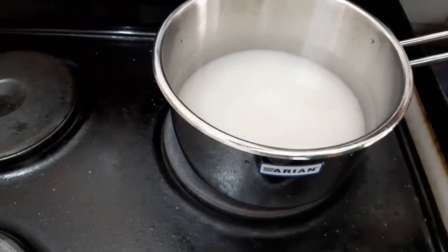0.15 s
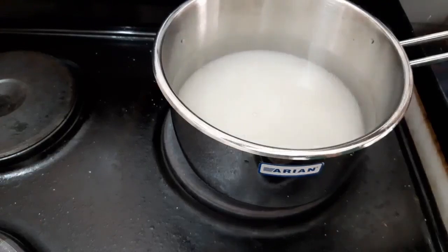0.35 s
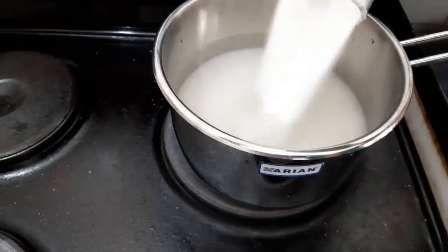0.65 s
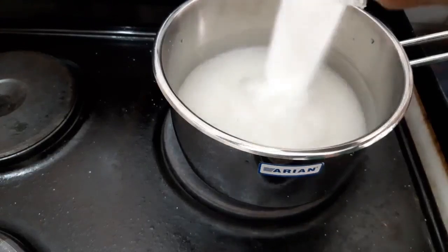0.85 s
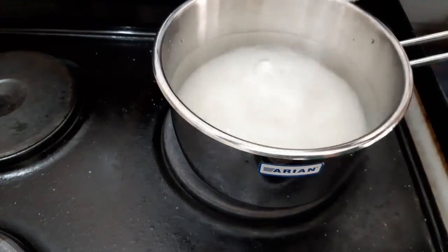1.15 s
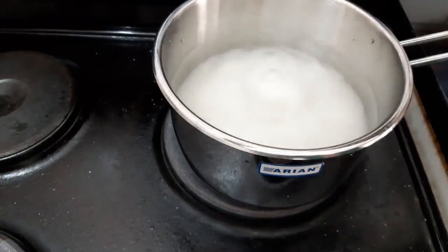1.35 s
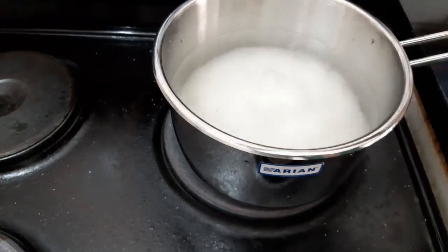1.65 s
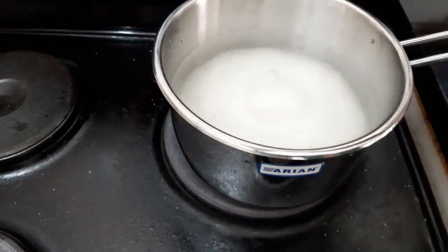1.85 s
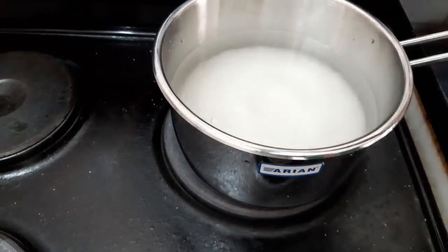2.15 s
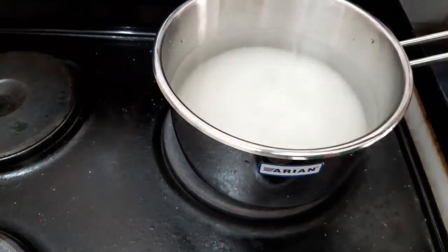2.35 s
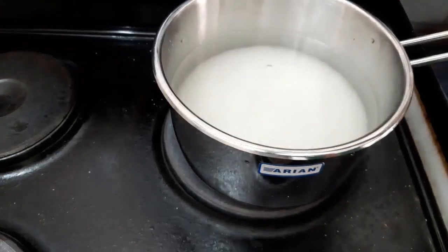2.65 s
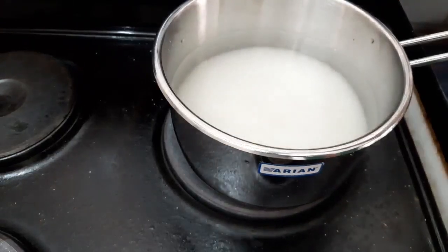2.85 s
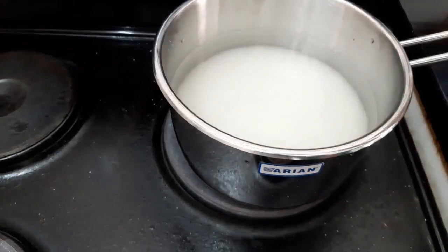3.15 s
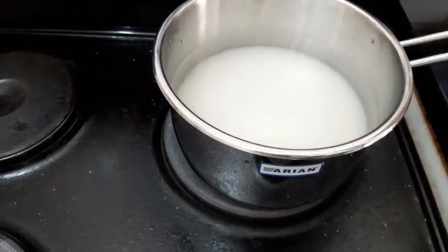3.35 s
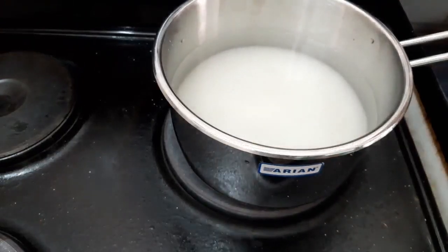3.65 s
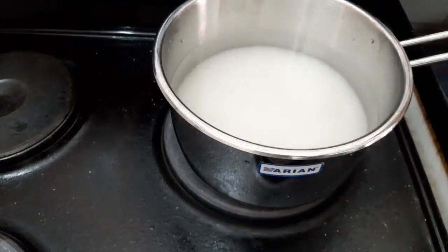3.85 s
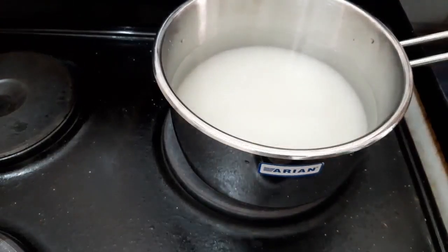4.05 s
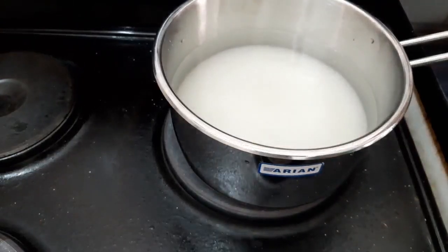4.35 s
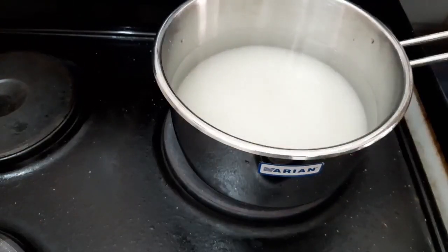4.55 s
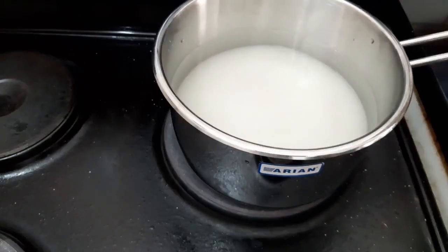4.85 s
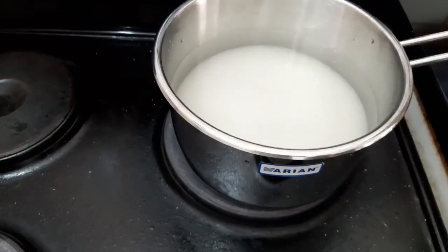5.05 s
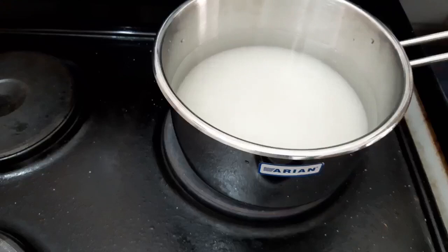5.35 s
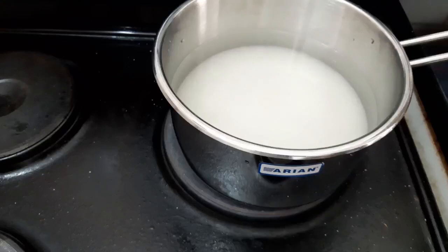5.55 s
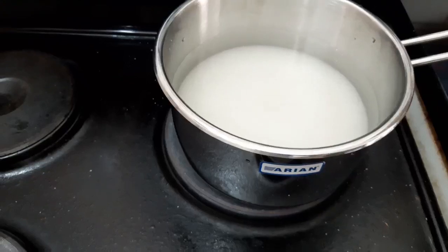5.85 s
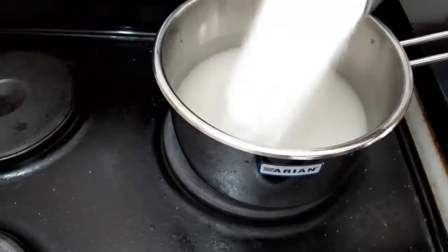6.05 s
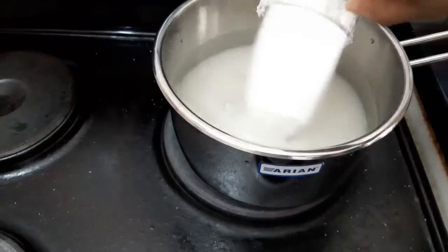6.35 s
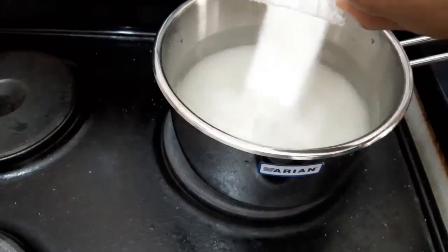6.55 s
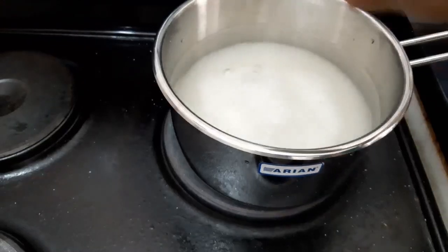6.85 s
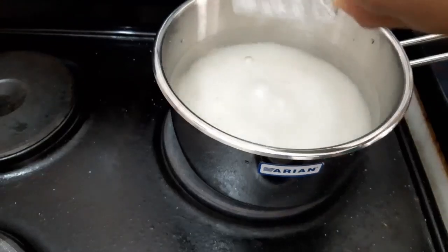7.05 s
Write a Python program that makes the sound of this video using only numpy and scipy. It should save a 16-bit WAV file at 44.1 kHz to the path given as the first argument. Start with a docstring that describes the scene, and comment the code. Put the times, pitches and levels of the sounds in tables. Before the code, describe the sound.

Close, nearly mono pickup in a small hard kitchen with a faint low hum. Sugar rushes into a steel saucepan of water with a crisp hiss, fizzing and small rising glugs. A spoon clinks on a cup, sugar is scooped and slides, a tin clatters and is set down heavily on the counter. After a split-second dropout, a second pour patters and bubbles.

```python
"""A small hard kitchen: sugar slides from a cup into a steel saucepan of water, twice, over a low hum.
Dense random grains make the hiss; rising tones make the glugs of trapped air and the small bubbles.
Between the pours a spoon clinks on a cup, sugar is scooped, a tin clatters and is set down on the counter:
short noisy pushes ring banks of decaying modes. The sound drops out for a moment before the second pour."""
import sys
import numpy as np
from scipy import signal
from scipy.fft import rfft, irfft, next_fast_len
from scipy.io import wavfile
from scipy.ndimage import uniform_filter1d

SR = 44100
rng = np.random.default_rng(int(sys.argv[2]) if len(sys.argv) > 2 else 0)


def bounce(signal):
    """Save signal as a 16-bit WAV file at the path given by the first command-line argument."""
    frames = np.transpose(np.atleast_2d(signal))
    limited = np.clip(frames, -1, 1)
    pcm = np.round(limited * 32767).astype(np.int16)
    wavfile.write(sys.argv[1], SR, pcm)


N = 318357
T = np.arange(N) / SR  # s

# Streams of sugar: first pour, scoop, long slide, second pour; each a list of
# start_s [s], fine_level_db [dB], coarse_against_fine_db [dB]
SUGAR_STREAMS = [
    [(0, -64, -23), (.05, -56, -19), (.25, -59, -16), (.32, -47.5, -16), (.52, -54.5, -9), (.608, -44, -17),
     (.67, -50, -6), (.76, -52.5, -6.5), (1.0, -57, -5.5), (1.2, -67, -4.5), (1.3, -81, -5)],
    [(1.75, -86, -9), (1.9, -63.5, -15), (2.11, -51.5, -2), (2.21, -48.5, -5.5), (2.25, -54, -3),
     (2.33, -58.5, -4.5), (2.52, -61.5, -3), (2.59, -55.5, -8.5), (2.63, -61.5, -4)],
    [(4.15, -77, -14), (4.27, -63, -8.5), (4.35, -47, -9.5), (4.48, -50.5, -4.5), (4.68, -55.5, -3),
     (4.79, -48.5, -6.5), (4.95, -53.5, -7), (5.12, -49.5, -2.5), (5.42, -66.5, -6.5), (5.57, -60, -5)],
    [(6.03, -66, -14.5), (6.08, -66.5, -14), (6.106, -55, -10), (6.29, -68, -16), (6.55, -62.5, -8),
     (6.78, -69.5, -10.5), (7.22, -81, 0)],
]
# Sugar shaken loose by a knock: peak_s [s], fine_level_db [dB], hold_s [s],
# coarse_against_fine_db [dB], hollow_against_fine_db [dB]
SPILLS = [(1.081, -59, 0.026, -13, -31), (2.633, -57.5, 0.044, -4.5, -26), (2.837, -52.5, 0.088, -8, -10.5),
          (3.084, -68.5, 0.0067, 4.5, -18), (3.33, -62, .05, -8.5, -1), (3.402, -49.5, .015, -15, -20),
          (3.456, -51, 0.067, 0, -4.5), (3.713, -69, 0.063, -10, -1), (3.863, -75.5, .05, 2.5, -6),
          (5.585, -51.5, 0.082, -3.5, -21), (5.733, -66, .12, -5, -23), (6.797, -62.5, 0.008, -18, -19),
          (6.979, -66, 0.015, -6, -8), (7.137, -63.5, 0.02, -11, -10)]
SPILL_ATTACK_S, SPILL_FALL_DB_PER_S = 0.0027, 209
# Fizz of the sinking heap: start_s [s], level_db [dB]
SETTLING = [(1.2, -78), (1.5, -70), (1.85, -66.5)]
# Bubbling that keeps the air in the pan sounding: start_s [s], level_db [dB]
BUBBLING = [(0, -100), (.31, -71), (.6, -58), (.8, -61), (1.1, -70.5), (1.22, -66.5), (1.35, -85),
            (1.75, -73.5), (2.2, -62.5), (2.6, -78), (4.2, -79.5), (4.5, -66.5), (5.5, -69), (6.05, -84),
            (6.2, -66), (6.57, -76), (6.75, -61), (7.22, -64)]
# Hands and cup moving on the counter: peak_s [s], rumble_level_db [dB], hold_s [s]
HAND_MOVES = [(0.28, -70, .2), (2.134, -62.5, .08), (2.883, -61.5, .04), (3.505, -67, .05), (4.28, -74, .2),
              (4.884, -57, .06), (5.087, -54.5, .18), (5.48, -70, .03), (5.587, -57, .04),
              (6.147, -59.5, .08), (6.69, -68, .2)]
HAND_ATTACK_S, HAND_FALL_DB_PER_S, STILL_RUMBLE_DB = 0.069, 117.5, -72.5
# Tone of the fine grains: pitch_hz [Hz], relative_level_db [dB per Hz]
FINE_TONE = [(2940, -23), (5000, -14), (7670, -14.5), (8670, -4), (10200, -6), (12600, -4), (15000, -6),
             (16000, -17)]
# Tone of the coarse slide: pitch_hz [Hz], relative_level_db [dB per Hz]
COARSE_TONE = [(700, -42.5), (1300, -3), (2200, 2), (4000, 3.5), (6000, 3), (8000, -2), (12000, -28.5)]
# Tone of the rumble in the counter: pitch_hz [Hz], relative_level_db [dB per Hz]
RUMBLE_TONE = [(60, -41.5), (115, -0.5), (165, -0.5), (250, 4.5), (450, -3), (700, -4), (1200, -54.5)]
STRAY_TICKS_PER_S, STRAY_TICK_DB = 41, -19  # dB against the fine grains
# Air column above the water: its pitch, and its t60 under bubbling and under glugs
PAN_HZ, PAN_BUBBLING_T60_S, PAN_GLUG_T60_S = 793, 3.65 / 254, 2.1 / 254

# Small bubbles and lumps: start_s [s], relative_level_db [dB], start_pitch_hz [Hz], t60_s [s]
POPS = [(0.5469, -30, 1810, 0.0086), (0.7291, -32, 2570, 0.0077), (0.7937, -33.5, 2800, 0.029),
        (1.0814, -32.5, 5670, 0.011), (1.1083, -36, 4400, 0.0015), (1.1766, -42, 2220, 0.0036),
        (1.2129, -39.5, 5570, 0.0047), (1.527, -46, 4350, 0.022), (1.699, -41, 4860, 0.0058),
        (1.8167, -52.5, 3920, 0.0025), (1.9014, -40.5, 6700, 0.011), (6.098, -33, 1580, 0.0028),
        (6.136, -26.5, 2300, 0.0033), (6.148, -43, 3140, 0.011), (6.1753, -32, 2740, 0.023),
        (6.2246, -40, 2350, 0.0045), (6.255, -39.5, 2550, 0.0038), (6.544, -51, 2230, 0.0055),
        (6.551, -40, 1390, 0.0031), (6.5923, -45, 1430, 0.0034), (6.8, -39.5, 5400, 0.0094),
        (6.9844, -37.5, 5000, 0.0029), (7.134, -49, 2800, 0.022), (7.1595, -50, 3340, 0.011)]
# Lone grains on the steel: start_s [s], peak_level_db [dB]
TICKS = [(0.153, -38), (0.1751, -33), (0.234, -31), (0.2828, -36), (0.2993, -33), (0.3173, -31),
         (0.335, -35), (0.3972, -33), (0.6254, -30), (0.996, -47), (1.0475, -38), (2.0842, -34),
         (3.4097, -27), (6.77, -38.5), (6.9092, -44)]
TICK_HZ = 8750
# Shower of lumps: from_s [s], to_s [s], middle_level_db [dB, relative], lowest_hz [Hz], highest_hz [Hz],
# t60_s [s, raised to at least 1 ms]
LUMP_SHOWER = (6.1, 6.3, -52, 898, 3600, -0.15)
# Big bubbles of trapped air: cue_s [s, the tone starts 6 ms before], relative_level_db [dB],
# start_pitch_hz [Hz], rise_octaves [octaves], length_s [s]
GLUGS = [(.546, -49, 790, 0.37, 0.026), (1.168, -57, 804, 0.72, 0.037), (1.427, -56, 715, 1.44, .036),
         (1.534, -58.5, 690, 2.1, 0.051), (1.621, -45, 716, 1.4, 0.039), (1.714, -46, 761, 0.65, 0.037),
         (1.813, -47, 801, .4, 0.037), (1.923, -54, 843, 0.3, 0.037), (2.048, -62, 817, 0.58, .03),
         (6.136, -43.5, 795, 0.38, 0.032), (6.227, -50, 760, .5, 0.024), (6.259, -50, 797, .4, 0.029),
         (6.347, -55.5, 813, 0.4, 0.028), (6.645, -52, 694, 0.35, 0.048),
         (6.912, -50.5, 693.5, 1.28, 0.061), (6.945, -55, 800, 1.5, 0.044),
         (7.001, -56.5, 637, 1.16, 0.061), (7.094, -53, 747, 1.3, 0.032), (7.162, -47, 718, 1.06, 0.041),
         (7.186, -43.5, 845, 0.98, 0.033)]
GLUG_LIFT_DB_PER_OCTAVE, GLUG_ROUGH_DB = 0.5, 3

# Spoon on cup: start_s [s], level_db [dB], main_pitch_hz [Hz], middle_modes_db [dB], high_modes_db [dB]
CLINKS = [(2.201, -40.5, 2043, 2.5, 6), (2.638, -37.5, 2215, -4, -8), (2.841, -43, 2203, 1, 0.5),
          (2.860, -33.5, 2215, -11, -5), (2.893, -42, 2215, -15, -8), (2.912, -44.5, 2215, 1.5, -6),
          (2.932, -41, 2190, -11, -10), (3.085, -42.5, 2206, -13, 4), (3.356, -55, 2280, -5, 0),
          (3.735, -50, 2250, -15, -11)]
# Cup modes: pitch_hz [Hz], relative_level_db [dB], t60_s [s]
CUP_MODES = [(800, -12, .04), (2060, -14, .04), (2280, -9, .04), (5280, 0, .03), (6650, -10, .02),
             (8680, -9, .02), (10270, 0, .03), (10500, -5, .02), (11400, -9, .02)]
CUP_T60_S, CUP_RISE_S, CUP_PUSH_S = 0.055, 0.003, 0.0016  # main ring decay, its swell; fall of the push
# Slides along the cup wall: peak_s [s], level_db [dB], hold_s [s], pitch_hz [Hz], t60_s [s]
MURMURS = [(3.334, -66.5, 0.061, 2214, 0.049), (3.45, -47.5, 0.047, 2060, 0.0064),
           (3.733, -63.5, 0.015, 2126, 0.088), (3.855, -61.5, 0.038, 1970, 0.0043),
           (6.097, -63, 0.15, 2380, 0.0014), (6.337, -75, 0.22, 2200, 0.016),
           (6.544, -69, 0.019, 1900, 0.0015), (6.708, -68.5, 0.059, 2570, 0.0017),
           (6.942, -68, 0.016, 2420, 0.0045)]
MURMUR_ATTACK_S, MURMUR_FALL_DB_PER_S = 0.031, 306

# The tin rattles as it is dragged: start_s [s], length_s [s], force_db [dB, relative],
# fade_by_end_db [dB], hardness_db [dB]
RATTLES = [(4.766, 0.16, -19.5, -16.5, -2), (5.004, 0.03, -27.5, 2.5, -6.5), (5.048, 0.17, -22, -30, 0)]
# Single blows on the tin: start_s [s], relative_level_db [dB]
TIN_BLOWS = [(4.768, -13.5), (4.774, -11), (4.81, -18), (4.839, -22), (5.008, -14.5), (5.056, -22.5),
             (5.091, -21)]
# Tin modes: pitch_hz [Hz], relative_level_db [dB]
TIN_MODES = [(463, -22), (603, -25.5), (662, -27), (703, -3), (735, 5), (810, 2), (875, -8.5), (912, 7.5),
             (950, -8), (1017, -17), (1098, -9), (1138, -5.5), (1350, -8.5), (1599, -6.5), (1981, -4.5),
             (2054, -2), (2204, 6.5), (2430, -5.5), (2589, -6.5), (2770, -6), (3101, -4), (3327, -4.5),
             (3736, -14.5), (4064, -27.5)]
TIN_T60_S = 0.083
# Dull body of the clatter: pitch_hz [Hz], gain_db [dB]
TIN_BODY = [(120, -40.5), (300, -21.5), (600, -7.0), (950, 15.5), (1600, 1.0), (2300, -39)]
# Bright edge of the clatter: pitch_hz [Hz], gain_db [dB]
TIN_EDGE = [(1200, -26.0), (2100, 2.5), (3300, -1.0), (4200, -7.0), (5200, -20.0), (15000, -28.5)]

# Things set down on the counter: start_s [s], relative_level_db [dB], brightness_db [dB, relative],
# strongest_pitch_hz [Hz]
THUDS = [(0.545, -42.5, -18, 950), (0.729, -36.5, -12, 430), (2.201, -39, -8, 428), (2.636, -38.5, -7, 304),
         (2.863, -42, -4.5, 746), (3.449, -46, -18, 1740), (3.52, -27, -13.5, 360), (4.452, -41, -33, 450),
         (5.459, -34, -12.5, 780), (5.49, -19, -21.5, 307), (5.583, -15, -13, 810),
         (5.608, -21.5, -10.5, 468)]
# Counter modes: pitch_hz [Hz], relative_level_db [dB], t60_s [s]
COUNTER_MODES = [(232, -22.5, 0.013), (340, -8.5, 0.29), (394, -12, 0.11), (462, -0.5, 0.08),
                 (520, 6, 0.022), (664, -15.5, 0.016), (757, 7, 0.046), (930, 2, 0.011), (1100, 5.5, 0.028),
                 (1396, 3, 0.044), (1593, 12.5, 0.012), (1930, 4, 0.0065), (2270, 2, 0.06)]
# Slap on top of a thud: pitch_hz [Hz], gain_db [dB]
SLAP_TONE = [(500, -26.0), (1500, -26.5), (3000, 1.5), (6000, -7.0), (15000, -10)]

# Low hums: start_s [s], level_near_63_hz_db [dB], level_near_110_hz_db [dB]
HUMS = [(0, -60.5, -75), (1.1, -67.5, -70), (1.3, -80, -75), (4.7, -80, -73.5), (4.8, -66, -58),
        (5.3, -72, -65), (5.9, -71, -70), (7.22, -71, -72)]
# Tone of the still air: pitch_hz [Hz], relative_level_db [dB per Hz]
AIR_TONE = [(15, -33.5), (25, -39), (108, -21), (335, -21), (503, 8.5), (624, -26), (796, 9.5), (936, -5),
            (5880, -17), (13200, -6), (16000, -26.5)]
AIR_DB = -71.5
# Room decay: pitch_hz [Hz], t60_s [s]
ROOM_DECAY = [(100, 0.16), (500, 0.36), (2000, 0.32), (6000, 0.15), (14000, 0.36)]
ROOM_DB, CUP_ROOM_DB = -3, -8  # the cup is nearer
# Faint left-right difference during hits: pitch_hz [Hz], gain_db [dB]
WIDTH_HITS = [(60, -27.5), (300, -27.5), (600, -21.5), (1200, -41), (2500, -45.5), (5000, -30),
              (14000, -25)]
# Faint left-right difference during steady sounds: pitch_hz [Hz], gain_db [dB]
WIDTH_STEADY = [(60, -18.5), (1000, -18), (5000, -38.5), (14000, -20)]
# Moment of silence: from_s [s], to_s [s]
DROPOUT = (5.907, 6.029)
TOP_HZ = 15900


def sugar():
    """Dense grains hiss; bubbling excites the air in the pan; hands rumble through the counter."""
    fine_gain, coarse_gain = sum(stream(table) for table in SUGAR_STREAMS)
    hollow_gain = gain(curves(BUBBLING)[0])
    for peak_s, db, hold_s, coarse_db, hollow_db in SPILLS:
        spill = swell(peak_s, db, hold_s, SPILL_ATTACK_S, SPILL_FALL_DB_PER_S)
        fine_gain = fine_gain + spill
        coarse_gain = coarse_gain + spill * gain(coarse_db)
        hollow_gain = hollow_gain + spill * gain(hollow_db)
    sinking = (T > SETTLING[0][0]) & (T < SETTLING[-1][0])
    settling = gain(curves(SETTLING)[0]) * sinking
    hands = gain(STILL_RUMBLE_DB)
    for row in HAND_MOVES:
        hands = hands + swell(*row, HAND_ATTACK_S, HAND_FALL_DB_PER_S)

    # each layer's level wanders by its own spread in dB
    fine_hits = grains(9000, 1.0) + gain(STRAY_TICK_DB) * grains(STRAY_TICKS_PER_S, 2.5)
    fine = unit(colour(fine_hits, FINE_TONE)) * (fine_gain + settling) * gain(1.4 * walk(30))
    coarse = unit(colour(grains(5000, 0.85), COARSE_TONE)) * coarse_gain * gain(1.8 * walk(25))
    pan_air = unit(ring(grains(600, 2.2), PAN_HZ, PAN_BUBBLING_T60_S))
    pan = pan_air * hollow_gain * gain(0.83 * walk(35))
    rumble = unit(colour(rng.standard_normal(N), RUMBLE_TONE)) * hands * gain(walk(17))
    return fine + coarse + pan + rumble


def pops():
    """Grains only tick; bubbles and lumps also ring a little, and a shower of lumps opens the second pour."""
    out, t = np.zeros(N), T[:2000]
    for start_s, db in TICKS:
        add(out, start_s, gain(db) * tick(TICK_HZ))
    from_s, to_s, middle_db, low_hz, high_hz, shower_t60 = LUMP_SHOWER
    shower = []
    for when, loud, high in rng.random(size=(60, 3)):
        lump_s = from_s + when * (to_s - from_s)
        lump_hz = low_hz * (high_hz / low_hz) ** high
        shower.append((lump_s, middle_db + 12 * (loud - .5), lump_hz, shower_t60))
    for start_s, db, hz, t60 in POPS + shower:
        rising = np.sin(2 * np.pi * hz * t * (1 + 6 * t))
        tone = rising * 1000 ** (-t / max(t60, .001))
        add(out, start_s, gain(db) * (0.7 * tone + 0.78 * tick(hz)))
    return out


def glugs():
    """A bubble climbs ever faster as it nears the surface, its loudness rough; the air in the pan rings along."""
    out = np.zeros(N)
    for cue_s, db, hz, rise_octaves, length_s in GLUGS:
        u = np.arange(0, 1, 1 / (max(length_s, .01) * SR))  # progress through the glug
        climb = rise_octaves * u ** 2.6  # pitch, in octaves
        shape = np.sin(np.pi * u ** .7) ** .45
        tone = np.sin(2 * np.pi * np.cumsum(hz * 2 ** climb) / SR) * shape
        add(out, cue_s - .006, gain(db + GLUG_LIFT_DB_PER_OCTAVE * climb) * tone)
    out = out * gain(GLUG_ROUGH_DB * walk(150))
    return .5 * out + 0.031 * ring(out, PAN_HZ, PAN_GLUG_T60_S)


def clinks():
    """The main ring of the hand-damped cup swells for an instant; a gritty push wakes the other modes."""
    out, t = np.zeros(N), T[:6000]
    shape = (1 - np.exp(-t / CUP_RISE_S)) ** 2 * 1000 ** (-t / CUP_T60_S)
    shape = shape / shape.max()
    for start_s, db, main_hz, middle_db, high_db in CLINKS:
        grit = rng.standard_normal(6000)
        add(out, start_s, gain(db) * np.sin(2 * np.pi * main_hz * t + grit[0]) * shape)
        force = grit * np.exp(-t / CUP_PUSH_S)
        for hz, mode_db, t60 in CUP_MODES:
            wake_db = 0 if hz < 3000 else middle_db if hz < 8000 else high_db
            add(out, start_s, gain(db + mode_db + wake_db) * struck(force, hz, t60))
    return out


def murmur():
    """Spoon and grains slide along the cup and keep it ringing roughly."""
    grit, out = grains(1500, 0.95), np.zeros(N)
    for peak_s, db, hold_s, hz, t60 in MURMURS:
        level = swell(peak_s, db, hold_s, MURMUR_ATTACK_S, MURMUR_FALL_DB_PER_S)
        out += unit(ring(grit, hz, t60)) * level
    return out


def tin():
    """Blows and a train of uneven chatter ring the thin walls of the tin and the counter under it."""
    chatter = grains(2500, 2.0)
    force, hardness = np.zeros(N), np.ones(N)
    for start_s, length_s, db, fade_db, hard_db in RATTLES:
        u = (T - start_s) / length_s  # progress through the rattle
        force = force + chatter * (u > 0) * (u < 1) * gain(db + fade_db * np.clip(u, 0, 1))
        hardness = np.where(u > 0, gain(hard_db), hardness)  # stays until the next rattle
    for start_s, db in TIN_BLOWS:
        blow = np.sign(rng.standard_normal(200)) * np.exp(-T[:200] / 0.0011)
        add(force, start_s, gain(db + 4.0) * blow)
    hard_force = force * hardness

    walls = np.zeros(N)
    active = slice(int(RATTLES[0][0] * SR), int(5.8 * SR))
    for hz, db in TIN_MODES:
        push = hard_force if hz > 1700 else force
        walls[active] += gain(db - 41) * ring(push[active], hz, TIN_T60_S)
    return walls + colour(force, TIN_BODY) + colour(hard_force, TIN_EDGE)


def thuds():
    """A blunt blow rings the counter briefly, most near its own pitch, with a bright slap on top."""
    out, t = np.zeros(N), T[:6000]
    for start_s, db, bright_db, pitch_hz in THUDS:
        grit = rng.standard_normal(6000)
        force = grit * np.exp(-t / .0035)
        for hz, mode_db, t60 in COUNTER_MODES:
            octaves_off = abs(np.log2(hz / pitch_hz))
            add(out, start_s, gain(db + mode_db - 12.0 - 8.5 * octaves_off) * struck(force, hz, t60))
        slap = colour(grit * np.exp(-t / 0.0095), SLAP_TONE)
        add(out, start_s, gain(db + bright_db + 5) * slap)
    return out


def kitchen():
    """Two wavering low hums, noise through narrow resonances, over the still air of the room."""
    low_db, high_db = curves(HUMS)
    low = ring(ring(rng.standard_normal(N), 63, .2), 63, .2)
    high = ring(ring(rng.standard_normal(N), 110, .07), 110, .07)
    air = colour(rng.standard_normal(N), AIR_TONE)
    return unit(low) * gain(low_db) + unit(high) * gain(high_db) + unit(air) * gain(AIR_DB)


def room(x):
    """Dense echoes of tiles and cupboards: octave bands of noise, each dying at its own rate."""
    t, tail = T[:SR // 2], 0
    hz_points, t60_points = np.transpose(ROOM_DECAY)
    for hz in 60 * 2. ** np.arange(9):
        octave = [(hz / 2, -40), (hz / 1.4, -3), (hz, 0), (hz * 1.4, -3), (hz * 2, -40)]
        band = colour(rng.standard_normal(len(t)), octave)
        t60 = np.interp(np.log(hz), np.log(hz_points), t60_points)
        tail = tail + band * 1000 ** (-t / t60) * np.minimum(t / 0.0041, 1)
    return signal.oaconvolve(x, tail / np.sqrt(np.sum(tail ** 2)))[:N]


def stream(table):
    """Gains of fine and coarse grains, silent outside the table."""
    fine_db, coarse_db = curves(table)
    inside = (T >= table[0][0]) & (T <= table[-1][0])
    return inside * np.array([gain(fine_db), gain(fine_db + coarse_db)])


def grains(per_s, spread_db):
    """Random tiny impacts, a few of them much larger, at rms 1."""
    hit = rng.random(N) < per_s / SR
    strength, size = rng.standard_normal(N), rng.exponential(size=N)
    return unit(hit * strength * gain(spread_db * np.minimum(size, 4)))


def tick(hz):
    """A click that spreads upward from its pitch, height 1."""
    burst = rng.standard_normal(2000) * np.exp(-T[:2000] / 0.0006)
    y = colour(burst, [(hz / 2, -36), (hz, 0), (hz * 2.1, -10), (hz * 6, -28)])
    return y / np.abs(y).max()


def struck(force, hz, t60):
    """A mode rung by a push, scaled to height 1."""
    y = ring(force, hz, t60)
    return y / np.abs(y).max()


def ring(x, hz, t60):
    """One decaying mode as a two-pole resonator; a unit pulse rings from height 1."""
    r = 1000 ** (-1 / (max(t60, .001) * SR))
    w = 2 * np.pi * min(hz, SR / 2.2) / SR
    return signal.lfilter([0, r * np.sin(w)], [1, -2 * r * np.cos(w), r * r], x)


def swell(peak_s, db, hold_s, attack_s, fall_db_per_s):
    """Gain that rises up to its peak time, holds, then dies away."""
    fall_db = fall_db_per_s * np.maximum(T - peak_s - hold_s, 0)
    return gain(db - fall_db) * np.clip((T - peak_s) / attack_s + 1, 0, 1) ** 2


def walk(rate):
    """Slow chance with spread 1, stepping about rate times a second, smoothed."""
    k = int(SR / rate)
    steps = np.repeat(rng.standard_normal(N // k + 1), k)
    return unit(uniform_filter1d(steps, k)[:N])


def colour(x, points):
    """Shape a spectrum by (Hz, dB) points, joined along log frequency."""
    hz, db = np.transpose(points)
    size = next_fast_len(len(x))
    f = np.arange(size // 2 + 1) * SR / size + 1  # +1 keeps the log finite
    shape = gain(np.interp(np.log(f), np.log(hz), db))
    return irfft(rfft(x, size) * shape, size)[:len(x)]


def curves(table):
    """Columns of timed rows, one value per sample."""
    s, *columns = np.transpose(table)
    return [np.interp(T, s, column) for column in columns]


def gain(db):
    """Decibels to gain."""
    return 10 ** (np.asarray(db) / 20)


def unit(x):
    """Scale to rms 1."""
    return x / np.sqrt(np.mean(x ** 2))


def add(out, start_s, piece):
    """Mix a piece in at its start time."""
    i = int(start_s * SR)
    out[i:i + len(piece)] += piece[:N - i]


def scene():
    """Nearly the same left and right, with a faint difference between them."""
    hits = pops() + glugs() + murmur() + tin() + thuds()
    # small things radiate no deep bass
    hits = signal.sosfilt(signal.butter(3, 175, "high", fs=SR, output="sos"), hits)
    steady = sugar() + kitchen()
    cup = clinks()
    echoes = room(gain(ROOM_DB) * hits + gain(CUP_ROOM_DB) * cup)
    mid = steady + hits + cup + echoes
    width = colour(room(hits + cup), WIDTH_HITS) + colour(room(steady), WIDTH_STEADY)
    return np.array([mid + width, mid - width])


def record(dry):
    """The sound falls silent for an instant; the loudest peaks are rounded; the top is cut steeply."""
    on = (T < DROPOUT[0]) | (T > DROPOUT[1])
    rounded = .4 * np.tanh(dry * on / .4)
    return signal.sosfilt(signal.ellip(10, .2, 80, TOP_HZ, fs=SR, output="sos"), rounded)


dry = scene()
out = record(dry)
bounce(out)
```